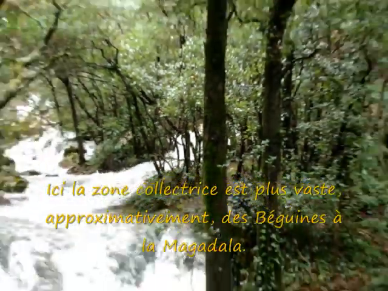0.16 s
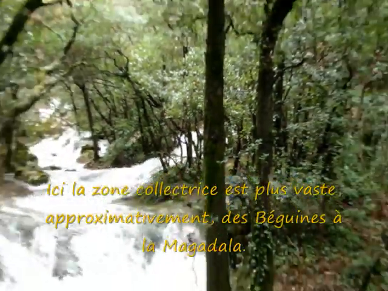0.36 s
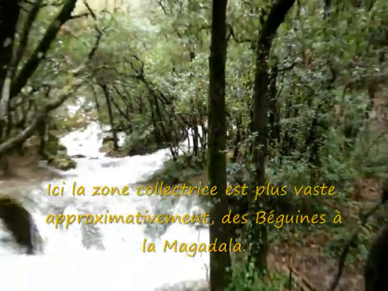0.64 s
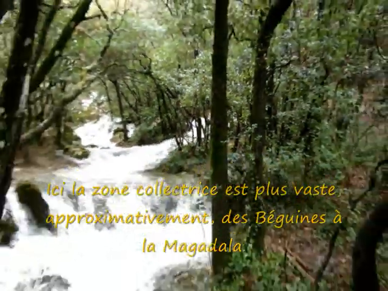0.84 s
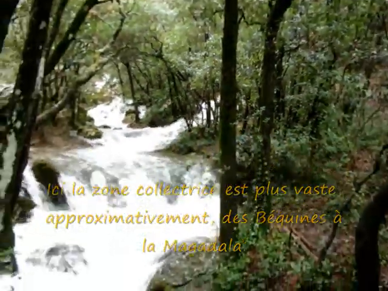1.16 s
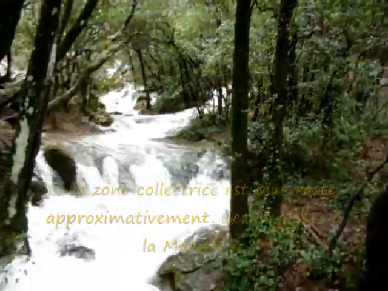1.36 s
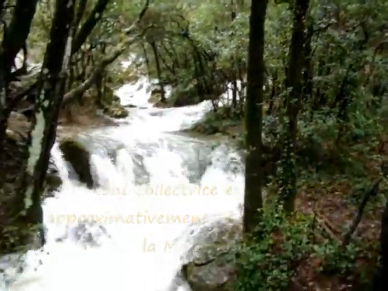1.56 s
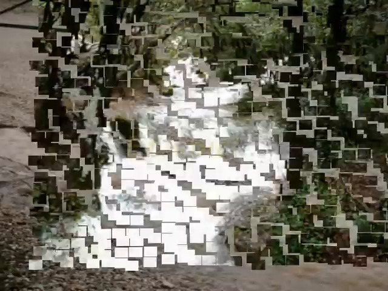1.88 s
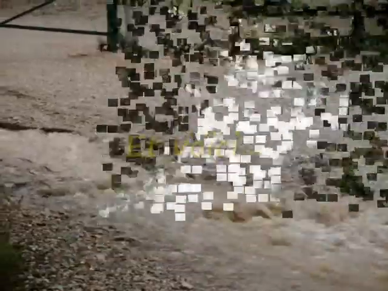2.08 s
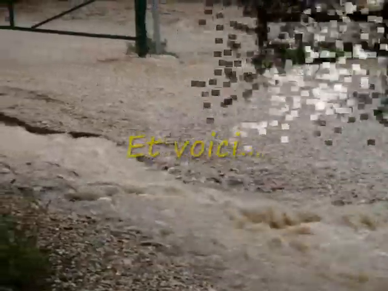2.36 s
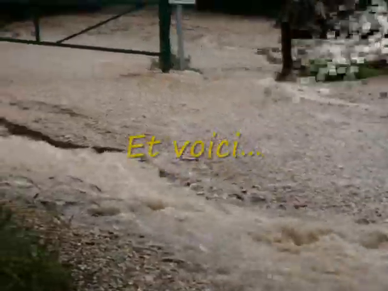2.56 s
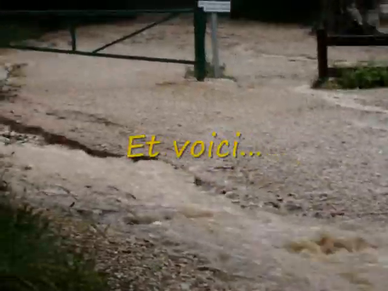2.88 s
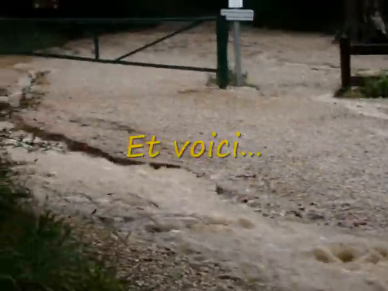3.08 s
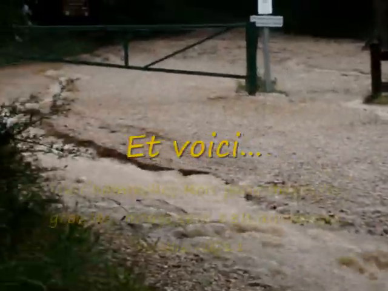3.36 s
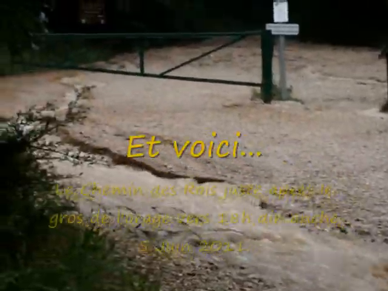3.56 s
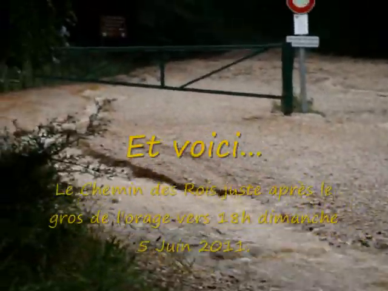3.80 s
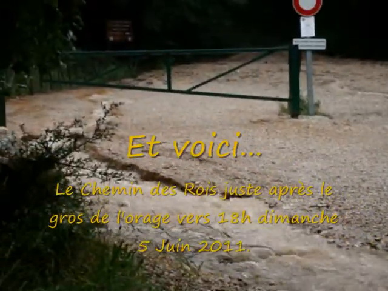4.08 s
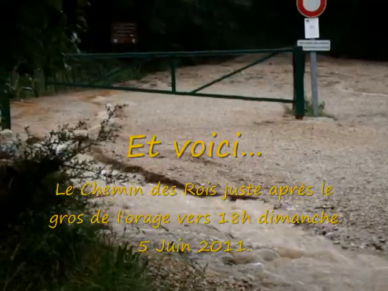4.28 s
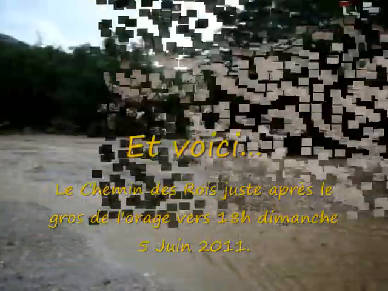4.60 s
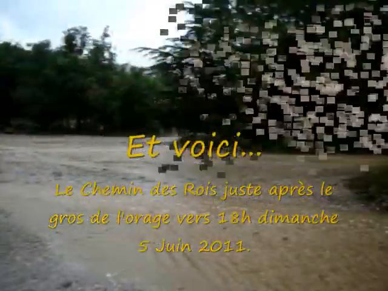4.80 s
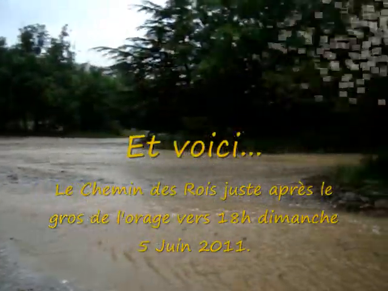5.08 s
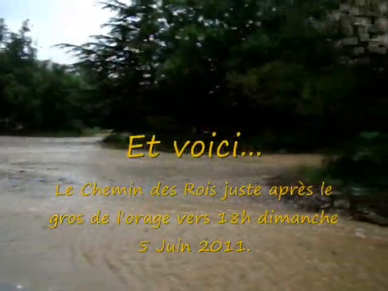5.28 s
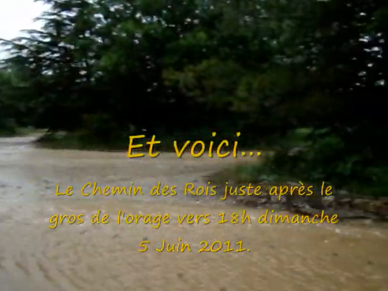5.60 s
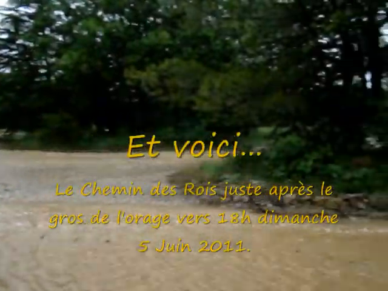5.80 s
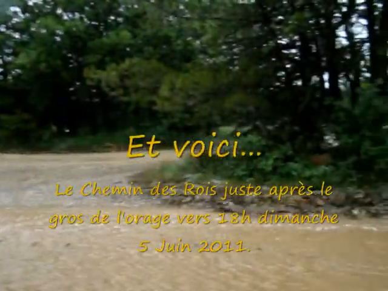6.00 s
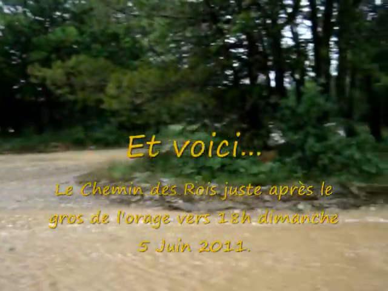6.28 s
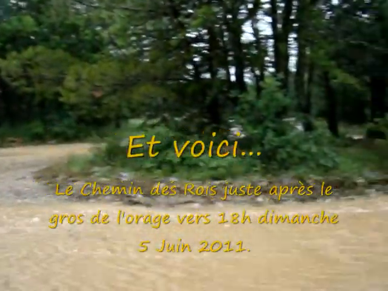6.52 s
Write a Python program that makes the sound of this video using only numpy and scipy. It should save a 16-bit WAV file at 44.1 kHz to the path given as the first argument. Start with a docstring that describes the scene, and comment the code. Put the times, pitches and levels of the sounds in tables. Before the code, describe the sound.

A loud, dense rush of white water pours over rocks in woodland. After about two seconds it fades into a quieter, shallow flood babbling over gravel, with small plops and spits close to the microphone. That blends into a softer, duller flow of muddy water gurgling and gulping along a track. Small waves gently lift the sound throughout.

```python
"""Storm water in woodland, on one microphone at three places that fade into one another.
First a white torrent over rocks; from about 2 s a shallow flood rattling over gravel, with the first
plops and spits close to the microphone; from about 4.5 s muddy water gurgling and gulping along a track.
Each place is a wash of countless far bubbles with nearer ones ringing out of it, lifted by small waves."""
import sys
import numpy as np
from scipy import signal
from scipy.fft import rfft, irfft, next_fast_len
from scipy.io import wavfile

SR = 44100
rng = np.random.default_rng(int(sys.argv[2]) if len(sys.argv) > 2 else 0)


def put_to_file(sound):
    """Save the sound as 16-bit audio at rate SR, in the file named by the first command-line argument."""
    columns = np.atleast_2d(sound).T  # one column per channel
    safe = np.clip(columns, -1, 1)
    whole_steps = np.round(safe * 32767)
    wavfile.write(sys.argv[1], SR, whole_steps.astype(np.int16))


N = 293265
CUTOFF_HZ = 10080


def from_db(db):
    """Decibels to gain."""
    return 10 ** (np.asarray(db) / 20)


def rms_one(x):
    """Scale to unit power."""
    return x / np.sqrt(np.mean(x ** 2) + 1e-20)


def filtered(x, gain_at):
    """Apply a gain given as a function of frequency."""
    size = next_fast_len(N + 8192)
    hz = np.maximum(np.fft.rfftfreq(size, 1 / SR), 1)
    return irfft(rfft(x, size) * gain_at(hz), size)[:N]


def drift(rate):
    """A slow random wander of spread 1, changing about rate times a second."""
    hop, settle = 100, 1000
    pole = np.exp(-2 * np.pi * rate * hop / SR)
    noise = rng.standard_normal(N // hop + settle + 2)
    slow = signal.lfilter([1], [1, -2 * pole, pole ** 2], noise)[settle:]
    return np.interp(np.arange(N) / hop, np.arange(len(slow)), rms_one(slow))


def swell(rows):
    """Gain over time: each swell is a bell curve of the given length and lift."""
    t = np.arange(N) / SR
    return from_db(sum(db * np.exp(-np.pi * ((t - crest) / length) ** 2) for crest, length, db in rows))


def fade(start_s, end_s, law=0.79):
    """Gains of the place being left and of the place being reached."""
    share = np.clip((np.arange(N) / SR - start_s) / (end_s - start_s), 0, 1)
    return (1 - share) ** law, share ** law


def eddies(stream, patchy_db=0.42, flicker_db=0.66):
    """Eddies come and go, so each half octave of bubble sizes wanders in level on its own."""
    centres = np.log(np.geomspace(220, 9500, 12))
    out = np.zeros(N)
    for band in np.eye(len(centres)):
        part = filtered(stream, lambda hz: np.interp(np.log(hz), centres, band))
        out += part * from_db(patchy_db * drift(5) + flicker_db * drift(30))
    return out


def water(spectrum, humps, near, near_db):
    """The far wash with near bubbles over it; humps mark bubble sizes the place favours or lacks."""
    def colour(hz):
        points, levels = np.transpose(spectrum)
        lift = sum(db / (1 + (2 * (hz - centre) / width) ** 2) for centre, width, db in humps)
        return from_db(np.interp(np.log(hz), np.log(points), levels) + lift)
    far_wash = rng.standard_normal(N)
    stream = eddies(far_wash + from_db(near_db) * near)
    return rms_one(filtered(stream, colour))


def ring(clicks, hz, cycles):
    """Each click sets a bubble ringing, a sine that falls 60 dB in so many cycles."""
    decay = np.exp(-np.log(1000) * hz / (cycles * SR))
    angle = 2 * np.pi * hz / SR
    return signal.lfilter([1, 0, -1], [1, -2 * decay * np.cos(angle), decay ** 2], clicks + 1e-18)


def bubbles(per_s, smallness, spread_db, cycles, clump_db):
    """Nearer bubbles of all sizes, born in clumps as wavelets break; even power per Hz."""
    pitches = np.geomspace(220, 9800, 28)
    # the higher the smallness, the more small, high-pitched bubbles outnumber large, low ones
    births = pitches ** smallness
    breaking, out = drift(7), np.zeros(N)
    for hz, share in zip(pitches, births / births.sum()):
        rate = per_s * share * from_db(clump_db * (.5 * breaking + drift(12)))
        born = np.flatnonzero(rng.random(N) < rate / SR)
        chance = rng.uniform(-1, 1, N)[born]
        rarity = np.minimum(-np.log(np.abs(chance) + 1e-9), 4)   # a few are louder than the rest
        clicks = np.zeros(N)
        clicks[born] = np.sign(chance) * from_db(spread_db * rarity)
        out += np.sqrt(hz) * rms_one(ring(clicks, hz, cycles))
    return rms_one(out)


# Colour of the water beside the rocks (frequency [Hz], relative level [dB])
TORRENT_SPECTRUM = [(35, -44), (60, -43), (100, -15.5), (170, -14), (260, -6.5), (380, -6.5), (540, -1.1),
                    (900, 0), (2000, -1.5), (3100, -1.5), (4500, -4), (8000, -6), (10000, -6.5)]
# Bubble sizes favoured or lacking there (centre [Hz], width [Hz], lift [dB])
TORRENT_SIZES = [(680, 310, 1.3), (1010, 420, -2), (1460, 410, 1.5), (1980, 160, 2.5)]


def torrent():
    """At the rocks: white water, a dense foam of short-lived bubbles."""
    foam = bubbles(per_s=14000, smallness=.6, spread_db=2.5, cycles=6.2, clump_db=2.0)
    return water(TORRENT_SPECTRUM, TORRENT_SIZES, foam, near_db=-5.0)


# Colour of the water beside the gravel (frequency [Hz], relative level [dB])
GRAVEL_SPECTRUM = [(35, -36), (70, -24), (120, -14), (180, -12), (270, -8.5), (420, -8.5), (600, -3.5),
                   (1000, -3.5), (1600, -1), (2400, -4), (4200, -11), (6500, -11), (8000, -14),
                   (10000, -17.5)]
# Bubble sizes favoured there (centre [Hz], width [Hz], lift [dB])
GRAVEL_SIZES = [(650, 85, 0.95), (814, 46, 1.0), (1590, 280, 0.85)]


def gravel_flood():
    """At the shallows: fewer bubbles, ringing longer and more uneven in level."""
    babble = bubbles(per_s=3000, smallness=.8, spread_db=3.0, cycles=23.4, clump_db=2.8)
    return water(GRAVEL_SPECTRUM, GRAVEL_SIZES, babble, near_db=-4.0)


# Colour of the water beside the track (frequency [Hz], relative level [dB])
TRACK_SPECTRUM = [(30, -32), (70, -12), (160, -9.5), (240, -4), (330, -1.5), (500, -7), (900, -7),
                  (1900, -9.5), (3500, -15.5), (5500, -21), (8000, -25.5), (10000, -27)]
# Bubble size favoured there (centre [Hz], width [Hz], lift [dB])
TRACK_SIZES = [(600, 120, 0.92)]
# Gulps of air that swell the deep churning (time [s], length [s], lift [dB])
AIR_GULPS = [(5.22, .1, 5), (5.44, 0.19, 3.5), (5.6, .2, 5.5), (5.87, 0.21, 4), (6.33, .2, 4.5),
             (6.63, .08, 6)]


def muddy_track(churn_top_hz=680):
    """On the track: the water swallows large pockets of air while the smaller bubbles carry on."""
    gurgle = bubbles(per_s=5500, smallness=.1, spread_db=0.5, cycles=15.6, clump_db=2.5)
    stream = water(TRACK_SPECTRUM, TRACK_SIZES, gurgle, near_db=-2.5)
    churn = filtered(stream, lambda hz: 1 / (1 + (hz / churn_top_hz) ** 4))
    return stream + (swell(AIR_GULPS) - 1) * churn


# Crests of the waves running through the water (time [s], length [s], lift [dB])
WAVE_CRESTS = [(0.19, 0.091, 0.9), (0.5, .17, 1.5), (1.85, 0.61, 0.64), (2.82, .16, 0), (3.43, 0.16, 1.5),
               (4.05, 0.25, 1), (4.5, 0.092, 1), (5.0, .15, 1.3), (5.75, 0.1, 1), (6.12, 0.13, 0.8),
               (6.37, 0.24, 1.4)]


def storm_water(torrent_db=-17.5, gravel_db=-25, track_db=-29):
    """The three places in turn; passing waves lift the whole stream above these levels."""
    torrent_out, gravel_in = fade(start_s=1.87, end_s=2.99)
    gravel_out, track_in = fade(start_s=4.46, end_s=5.4)
    stream = from_db(torrent_db) * torrent_out * torrent()
    stream += from_db(gravel_db) * gravel_in * gravel_out * gravel_flood()
    stream += from_db(track_db) * track_in * muddy_track()
    return swell(WAVE_CRESTS) * stream


# Bubbles close to the microphone (time [s], ring peak [dB], starting pitch [Hz], ring length [cycles])
CLOSE_PLOPS = [(2.4514, -11.5, 1510, 4), (2.779, -13, 1340, 3.5), (2.809, -14, 3004, 11),
               (2.8098, -15, 1400, 7.1), (2.854, -11.5, 1310, 5.9), (2.903, -10.5, 3800, 6.1),
               (2.907, -25, 373, 10.6), (2.9129, -19, 554, 12.4), (2.9267, -12, 1990, 3),
               (2.9852, -14, 3350, 3), (3.056, -21, 990, 14), (3.08, -25, 640, 10), (3.2561, -15, 4250, 3),
               (3.3892, -20.5, 407, 7.2), (3.4728, -13, 1690, 12), (3.8988, -15, 590, 12),
               (4.0299, -12.5, 5900, 10), (4.054, -18, 5800, 10), (4.188, -13.5, 1000, 5.7),
               (4.355, -24.5, 695, 17), (4.397, -25.5, 330, 12), (5.423, -24, 303, 12),
               (6.0888, -14, 1690, 3.8), (6.1187, -12.5, 980, 4.8), (6.124, -25, 2300, 11)]


def plops(spatter_db=-16.5, spatter_s=0.0094):
    """A close bubble rings briefly, climbing in pitch as it nears the surface, and throws spatter."""
    out = np.zeros(N)
    t = np.arange(SR // 20) / SR
    for start_s, db, hz, cycles in CLOSE_PLOPS:
        turns = t * hz
        rise = 0.78 * 560 / hz   # large bubbles climb most: by 78 % from 560 Hz
        envelope = (1 - np.exp(-2 * turns)) ** 2 * np.exp(-np.log(1000) * turns / cycles)
        outflow = envelope * np.sin(2 * np.pi * turns * (1 + rise * turns / cycles / 2))
        pressure = np.gradient(outflow)   # sound follows the change of flow, so there is no thud
        band = signal.butter(1, [hz / 2, min(2 * hz, CUTOFF_HZ)], "band", fs=SR, output="sos")
        drops = rms_one(signal.sosfilt(band, rng.standard_normal(len(t))))
        spatter = from_db(spatter_db) * drops * np.exp(-t / spatter_s)
        plop = from_db(db) * (pressure / np.abs(pressure).max() + spatter)
        start = int(start_s * SR)
        out[start:start + len(t)] += plop[:N - start]
    return out


def scene():
    """Running water and close plops on one microphone, the same in both channels."""
    return np.tile(storm_water() + plops(), (2, 1))


def record(dry):
    """The treble is cut steeply above about 10 kHz."""
    lowpass = signal.ellip(14, .1, 90, CUTOFF_HZ, fs=SR, output="sos")
    return signal.sosfilt(lowpass, dry)


dry = scene()
out = record(dry)
put_to_file(out)
```